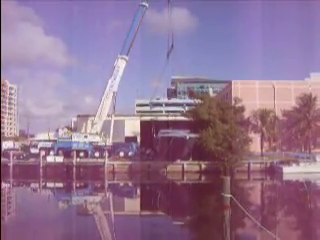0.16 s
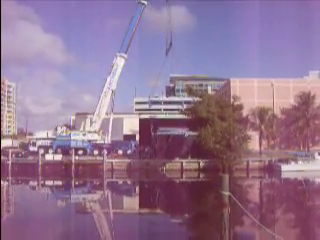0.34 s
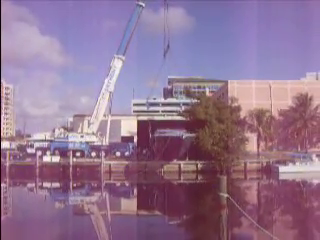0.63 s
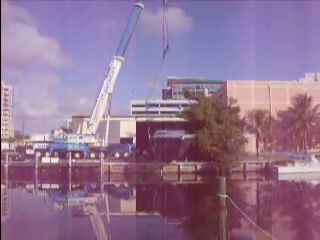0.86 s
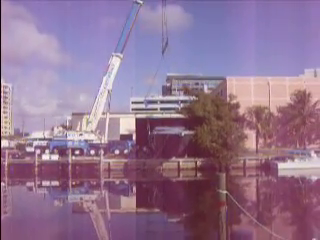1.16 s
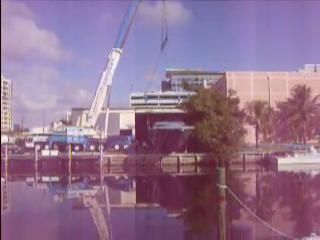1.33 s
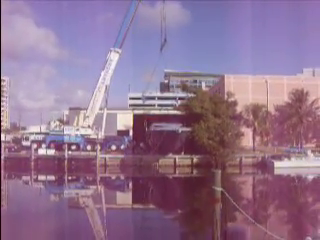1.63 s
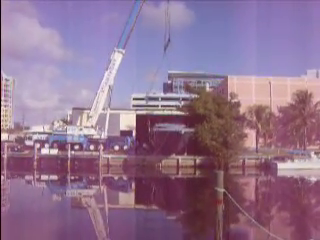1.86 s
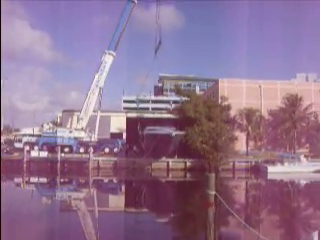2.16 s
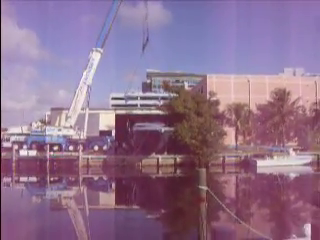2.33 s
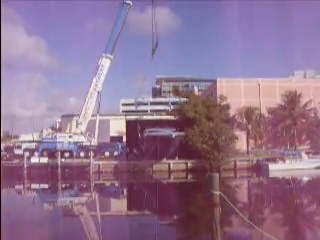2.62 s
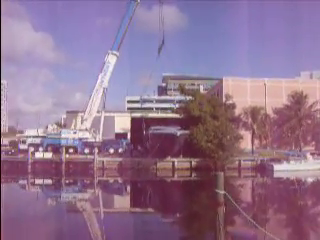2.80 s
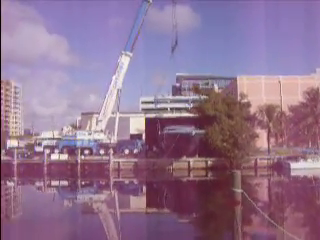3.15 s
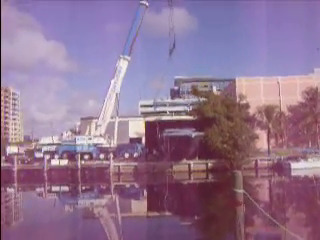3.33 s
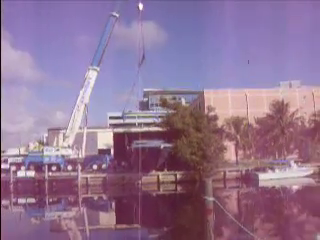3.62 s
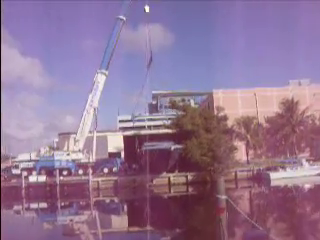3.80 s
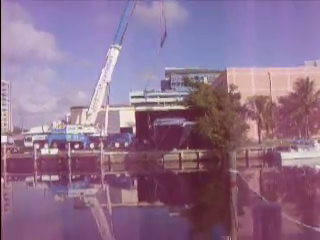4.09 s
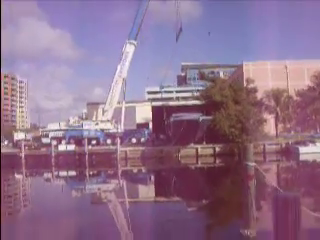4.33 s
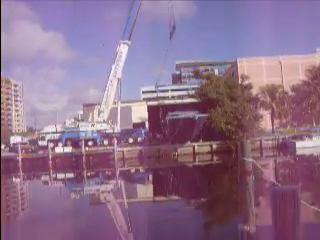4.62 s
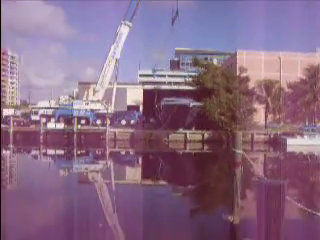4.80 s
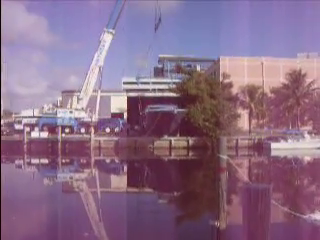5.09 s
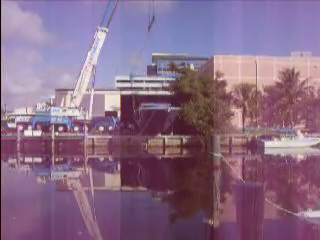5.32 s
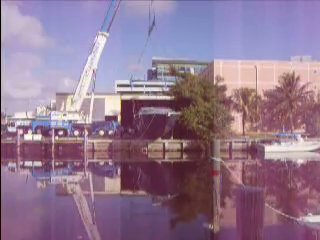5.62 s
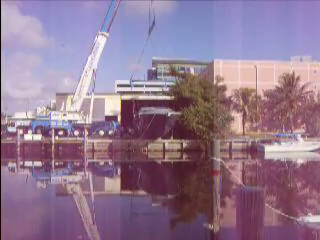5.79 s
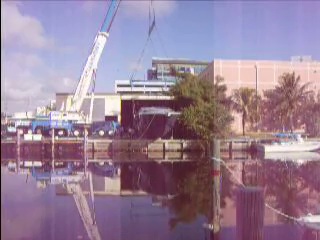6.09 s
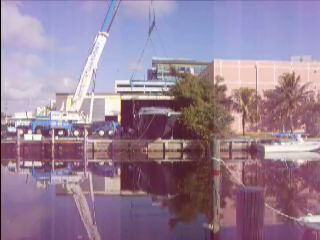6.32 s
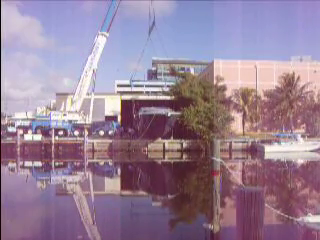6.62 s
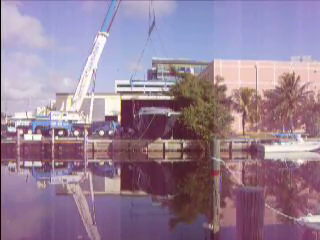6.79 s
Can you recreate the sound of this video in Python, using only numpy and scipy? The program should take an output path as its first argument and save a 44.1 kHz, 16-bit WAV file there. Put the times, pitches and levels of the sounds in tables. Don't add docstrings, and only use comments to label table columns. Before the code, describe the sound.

Constant deep engine drone from a working mobile crane outdoors, faint whine and airy hiss on top, broken by brief handling clicks midway.

```python
import sys
import numpy as np
from scipy import signal
from scipy.fft import rfft, irfft
from scipy.io import wavfile
from scipy.ndimage import map_coordinates

SR = 44100
rng = np.random.default_rng(int(sys.argv[2]) if len(sys.argv) > 2 else 0)


def dump_mix(stems):
    frames = np.atleast_2d(stems).T
    limited = np.clip(frames, -1, 1)
    pcm = np.round(limited * 32767).astype(np.int16)
    wavfile.write(sys.argv[1], SR, pcm)


def level_to_linear(level):
    exponent = np.asarray(level, float) / 20
    return 10 ** exponent


N = 306495
T = np.arange(N) / SR


def walk(rate_hz):
    knots = rng.standard_normal(200)
    return map_coordinates(knots, [np.clip(T * rate_hz, 0, 198)], order=3)


def tone(turns, level_db, flutter_db, rate_hz):
    phase = 2 * np.pi * (turns + rng.random())
    return np.sqrt(2) * level_to_linear(level_db + flutter_db * walk(rate_hz)) * np.sin(phase)


def orders(cycle, rows, pose, flutter_db, rate_hz):
    return sum(tone(order * cycle, level_db + np.dot(lean_db, pose), flutter_db, rate_hz)
               for order, level_db, *lean_db in rows)


def shape(hz, points):
    at_hz, level_db = np.transpose(points)
    return level_to_linear(np.interp(np.log(np.maximum(hz, 1)), np.log(at_hz), level_db))


def decay(t, t60_s):
    return np.exp(-np.log(1000) * t / t60_s)


def breeze():
    rumble = signal.lfilter(*signal.iirpeak(24, 1.6, fs=SR), rng.standard_normal(N))
    return level_to_linear(-50 - 0.5 * walk(5)) * rumble / rumble.std()


# firing_multiple, level_db [dB rms]
IDLER_ORDERS = [(1, -36.5), (2, -44.5), (3, -49.5), (4 / 3, -51), (5 / 3, -49)]


def idler():
    firing_hz = 35.03 * (1 + 0.0025 * walk(2.7))
    turns = np.cumsum(firing_hz) / SR
    return sum(tone(multiple * turns, level_db, 1.3 if multiple == 1 else 2.6, 2.5)
               for multiple, level_db in IDLER_ORDERS)


# start_s, level_db, tilt_db [dB brighter per mode], scrape_db [after the slip]
CLICKS = [(2.85, -19.5, 1, -25), (2.9448, -35, -1.5, -15), (2.9922, -32.5, 0, -9), (3.2498, -32.5, -3, -6),
          (4.442, -35, 0, -8), (4.5122, -39, 3.5, -12), (4.971, -25, -4, -7), (4.9718, -9.5, 3.5, -24),
          (4.9727, -19.5, 1, -11), (4.9783, -34, -6, -4), (5.022, -31.5, -5.5, -3), (5.2030, -45, 2, -4),
          (5.209, -42, -1, -1), (5.2135, -42, 1.5, -6), (5.27, -34, -2, -10), (5.3422, -30, -2.5, -8),
          (5.388, -42, -8, -8)]
# pitch_hz, t60_s
SHELL_MODES = [(1450, .005), (3200, .004), (5600, .0035), (7800, .0025)]
# start_s, pitch_hz, peak_db, t60_s
THUDS = [(2.8501, 5900, -19, .004), (2.8505, 900, -27, .008), (2.8507, 3130, -11, 0.0036),
         (2.852, 2620, -23, .007), (2.9446, 5700, -27, .004), (2.9447, 2300, -28, .004),
         (4.9716, 1450, -16.5, .014), (4.9721, 9700, -13, .003), (4.9728, 785, -17, 0.021),
         (4.9765, 530, -18.5, 0.043), (4.9768, 263, -21, 0.044), (5.388, 3080, -34, 0.011)]


def shell():
    scrape_t60_s, slip_s = 0.018, 0.00008
    out, t = np.zeros(N), T[:SR // 40]
    for start_s, level_db, tilt_db, scrape_db in CLICKS:
        force = level_to_linear(scrape_db) * 0.4 * rng.standard_normal(len(t)) * decay(t, scrape_t60_s)
        force[0] = 1
        ring = np.zeros(len(t))
        for k, (pitch_hz, t60_s) in enumerate(SHELL_MODES):
            mode_db = level_db + tilt_db * (k - len(SHELL_MODES) / 2 + 1)
            sign = (-1) ** k
            ring += sign * level_to_linear(mode_db) * decay(t, t60_s) * np.sin(2 * np.pi * pitch_hz * t)
        ring *= 1 - np.exp(-t / slip_s)
        i = int(start_s * SR)
        out[i:i + len(t)] += np.convolve(force, ring)[:len(t)]
    for start_s, pitch_hz, peak_db, t60_s in THUDS:
        i = int(start_s * SR)
        onset = 1 - np.exp(-4 * pitch_hz * t)
        out[i:i + len(t)] -= level_to_linear(peak_db) * np.sin(2 * np.pi * pitch_hz * t) * decay(t, t60_s) * onset
    return out


# start_s, firing_hz, turn [0-1], load [0-1]
WORK = [(0.0, 78.85, 0.18, 0.0), (0.6, 78.76, 0.0, 0.04), (1.2, 78.8, 0.05, 0.13), (1.8, 78.86, 0.23, 0.34),
        (2.3, 78.95, 0.45, 0.3), (2.7, 78.93, 0.55, 0.33), (3.1, 78.9, 0.56, 0.68),
        (3.5, 78.83, 0.73, 0.91), (3.9, 78.83, 0.91, 1.0), (4.4, 78.82, 0.91, 0.99),
        (4.8, 78.87, 0.92, 0.82), (5.1, 79.32, 0.72, 0.6), (5.4, 79.02, 0.9, 0.72),
        (5.7, 78.62, 0.93, 0.52), (6.0, 78.64, 0.87, 0.38), (6.4, 78.68, 0.88, 0.16),
        (6.95, 78.67, 1.0, 0.21)]


def motion():
    start_s, *columns = np.transpose(WORK)
    firing_hz, turn, load = [np.interp(T, start_s, column) for column in columns]
    broadside_s, width_s = 2.9, 0.8
    broadside = np.exp(-0.5 * ((T - broadside_s) / width_s) ** 2)
    return firing_hz, np.array([c - c.mean() for c in (turn, broadside, load)])


# pitch_hz, level_db [dB per Hz]
ROAR = [(30, -79), (100, -64.5), (200, -68), (600, -72), (1000, -75), (1600, -78), (2050, -79), (2550, -85),
        (3200, -83.5), (3750, -82.5), (4050, -84.5), (5000, -84), (7800, -92.5), (10500, -93.5)]


def roar(cycle):
    spectrum = rfft(rng.standard_normal(N)) * shape(np.fft.rfftfreq(N, 1 / SR), ROAR)
    noise = irfft(spectrum, N) * np.sqrt(SR / 2)
    puffs = 0.03 * np.cos(2 * np.pi * 3 * cycle) + 0.045 * np.cos(2 * np.pi * cycle)
    return noise * (1 + puffs)


# level_db, then its lean in dB per turn, broadside, load
TURBO = (-54, -3, -3.5, 5.5)
# spacing [in threes of cycle orders], level_db
TURBO_SIDES = [(-3, -16), (-2, -14), (-1, -16), (0, -10), (1, -16), (2, -15), (4, -18), (6, -19)]


def turbo(cycle, pose):
    level_db = TURBO[0] + np.dot(TURBO[1:], pose)
    turns = 448 * cycle + np.cumsum(8.4 * walk(10)) / SR
    comb = sum(tone(turns + 3 * round(k) * cycle, side_db, 3.2, 2.4) for k, side_db in TURBO_SIDES)
    breath = signal.lfilter(*signal.iirpeak(5900, 11, fs=SR), rng.standard_normal(N))
    return level_to_linear(level_db) * (comb + level_to_linear(-7) * breath / breath.std())


# cycle_order, level_db, dB per turn, broadside, load
PUMP = [(21.5, -48.4, -3.2, -13.0, 8.6), (22, -55.4, 18.4, -1.2, -5.4), (86, -55.6, -2.4, -3.6, 6.7)]
# cycle_order, level_db, dB per turn, broadside, load
COVER = [(30, -60, 5, -4, -4.5), (42, -51.6, .9, 2.4, 1.1), (55, -59.5, -8, 9.5, -6),
         (57, -52.4, -.1, 3.3, -4.4), (58, -59, -9, -1, 1.5), (59, -58, -9, -2.5, 6),
         (63, -58, -3, -2, 1.5), (64, -61, 1.5, 3, -3), (70, -62.5, 2, -.5, -4), (74, -52.5, -6, .1, 6.1),
         (75, -54.5, -9.1, -1.5, 12.4), (78, -62, -2, 3.5, 3)]


def pump(cycle, pose):
    ripple = level_to_linear(0.34) * orders(cycle, PUMP, pose, 1.4, 4)
    return ripple + level_to_linear(0.4) * orders(cycle, COVER, pose, 1.4, 3.1)


# pitch_hz, level_db [dB rms]
CLATTER = [(20, -76), (150, -63), (300, -64.5), (700, -62), (1100, -62), (1500, -73.5), (2200, -83),
           (2600, -83.5), (4500, -77.5), (6000, -122.5)]
# cycle_order, level_db [dB rms]
RINGING = [(3, -67), (7, -53), (11, -55), (14, -57.5), (24, -55), (27, -60), (28, -53.5), (32, -59),
           (36, -52.5), (41, -56.5), (43, -54.5), (49, -55), (51, -54), (60, -54.5), (66, -61), (80, -60),
           (82, -62), (90, -59.5), (93, -59), (102, -62), (104, -64), (108, -64), (120, -67.5), (121, -74),
           (129, -75), (138, -62.5), (147, -63), (162, -66), (172, -80), (178, -74)]
# cycle_order, level_db [dB rms]
GEARS = [(207.5, -66), (296.4, -66), (308, -67), (325, -72), (198.6, -70), (233, -67)]


def clatter(cycle):
    size, cycle_hz, drift = 4096, 13.55, 0.22
    gain = shape(np.arange(size // 2 + 1) * cycle_hz, CLATTER) * size / 2
    gain[[round(row[0]) for row in RINGING]] = 0
    gain[[round(row[0]) for row in EXHAUST + PUMP + COVER]] = 0
    place = cycle % 1 * size
    impacts = np.zeros(N)
    for k in range(4):
        chance = rng.standard_normal(len(gain)) + 1j * rng.standard_normal(len(gain))
        pattern = irfft(gain * chance)
        weight = 1 if k == 0 else drift * walk(1.56)
        impacts += weight * np.interp(place, np.arange(size), pattern, period=size)
    impacts /= np.sqrt(1 + 3 * drift ** 2)
    ringing = sum(tone(round(order) * cycle, level_db, 2.8, 1.52) for order, level_db in RINGING)
    whine = sum(tone(order * cycle, level_db, 2.8, 3.07) for order, level_db in GEARS)
    return impacts + ringing + whine


# pitch_hz, then dB per turn, broadside, load
SLEW = [(655, -2.5, 3, 3), (920, -2, -2, 4.5), (1440, 4.5, -.5, -0.3), (2000, -4, 2.1, 0.3),
        (2860, -1.7, -0.7, 2), (3800, -3, 1, 5.5), (5200, -3, 3, 2), (8000, -0.5, 0.3, 1.5)]


def slew(x, pose):
    spectrum = rfft(x)
    log_hz = np.log(np.fft.rfftfreq(N, 1 / SR) + 1)
    centres = np.log([420] + [row[0] for row in SLEW])
    sways_db = [0 * T] + [np.dot(lean_db, pose) for _, *lean_db in SLEW]
    out = np.zeros(N)
    for peak, sway_db in zip(np.eye(len(centres)), sways_db):
        band = irfft(spectrum * np.interp(log_hz, centres, peak), N)
        out += band * level_to_linear(sway_db + 0.5 * walk(6))
    return out


# cycle_order, level_db [dB rms], dB per turn, broadside, load
EXHAUST = [(6, -29.3, -1.9, -1.1, 0.4), (9, -44.8, 0.9, 1.5, -0.5), (12, -32.8, 8.4, 2.2, -1.1),
           (18, -53.7, -14.3, -2.0, -0.4)]


def exhaust(cycle, pose):
    return orders(cycle, EXHAUST, pose, 0.23, 9)


def scene():
    firing_hz, pose = motion()
    cycle = np.cumsum(firing_hz / 6) / SR
    background = breeze() + idler() + shell()
    body = slew(roar(cycle) + clatter(cycle), pose)
    crane = body + turbo(cycle, pose) + pump(cycle, pose) + exhaust(cycle, pose)
    return (background + crane)[None]


def low_pass(x):
    return signal.sosfilt(signal.butter(12, 12300, fs=SR, output="sos"), x)


def record(dry):
    ceiling = 0.66
    low = signal.butter(2, 7.3, "high", fs=SR, output="sos")
    top = signal.butter(10, 10470, fs=SR, output="sos")
    heard = signal.sosfilt(low, dry)
    rounded = ceiling * np.tanh(heard / ceiling)
    mix = signal.sosfilt(top, rounded)
    return low_pass(mix)


dry = scene()
out = record(dry)
dump_mix(out)
```